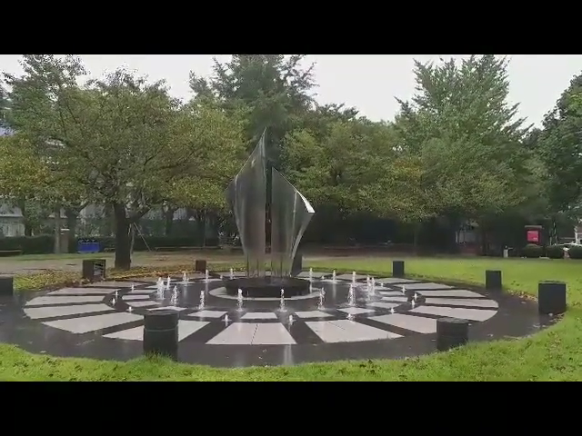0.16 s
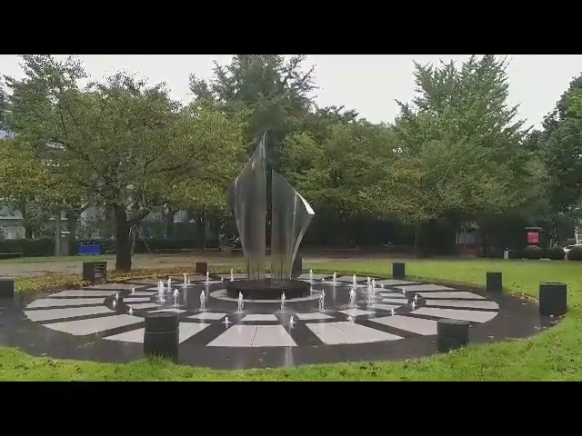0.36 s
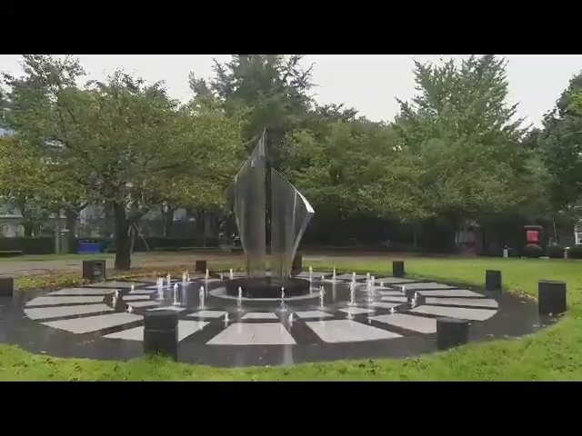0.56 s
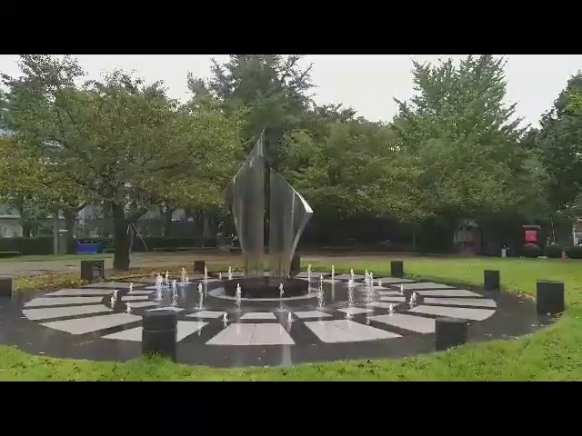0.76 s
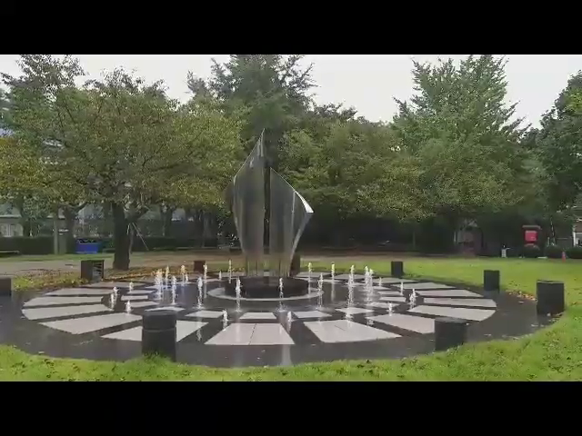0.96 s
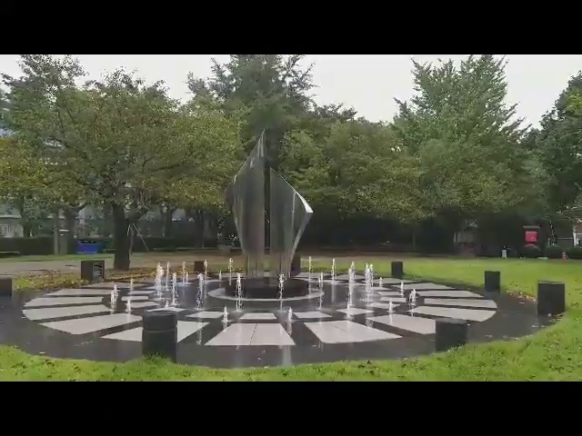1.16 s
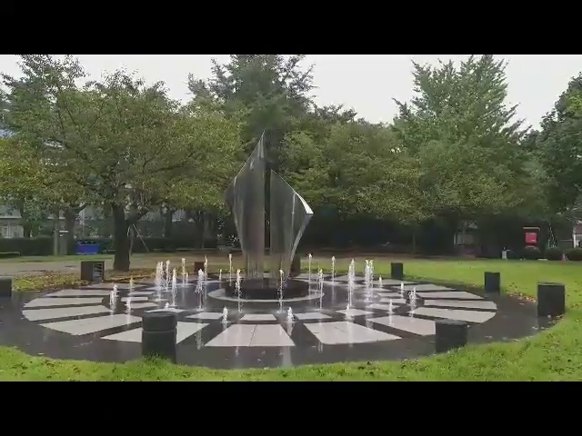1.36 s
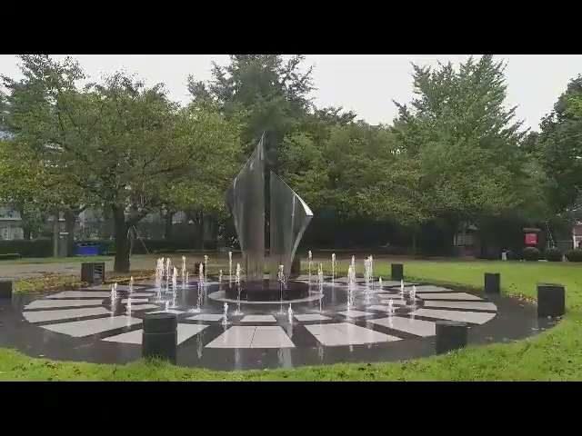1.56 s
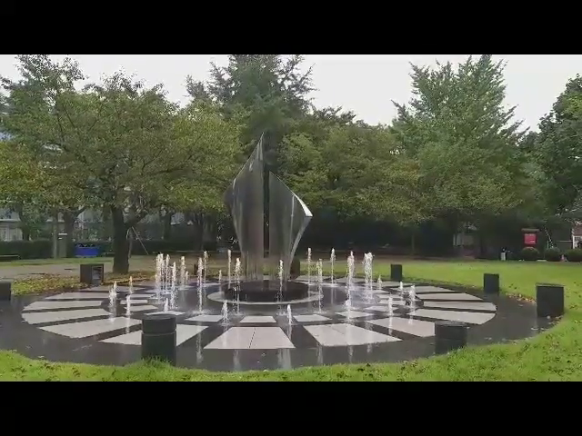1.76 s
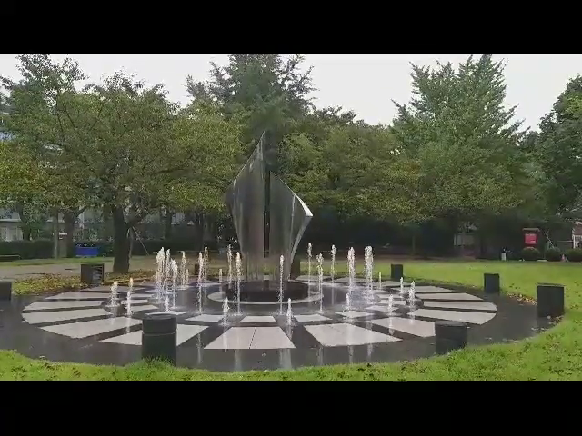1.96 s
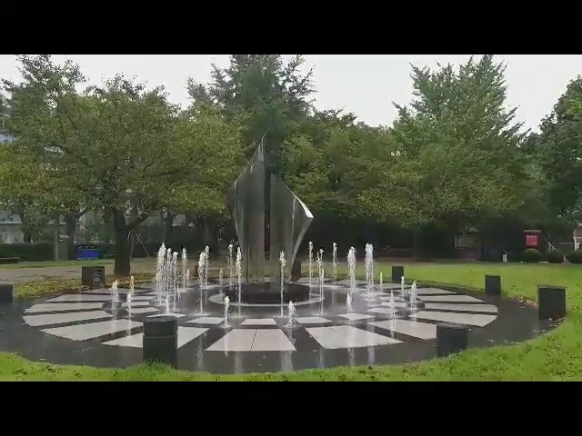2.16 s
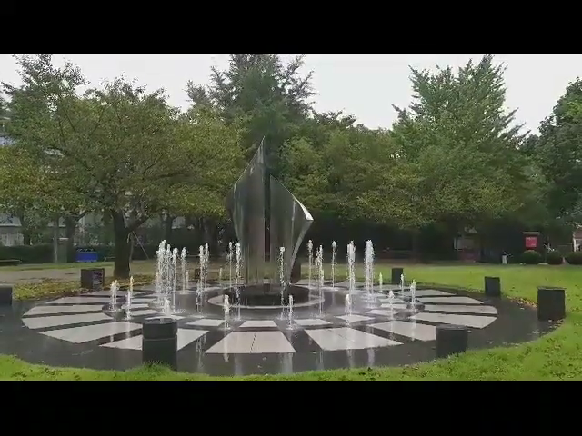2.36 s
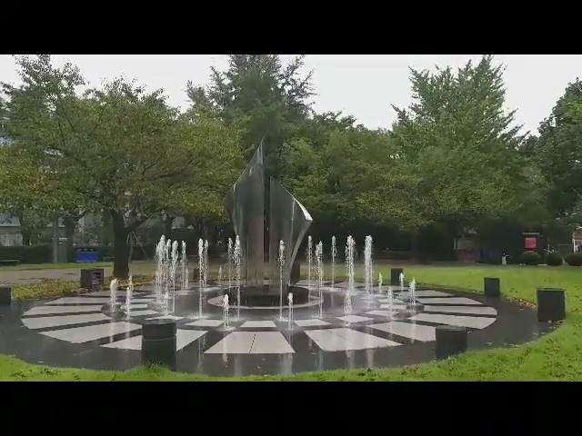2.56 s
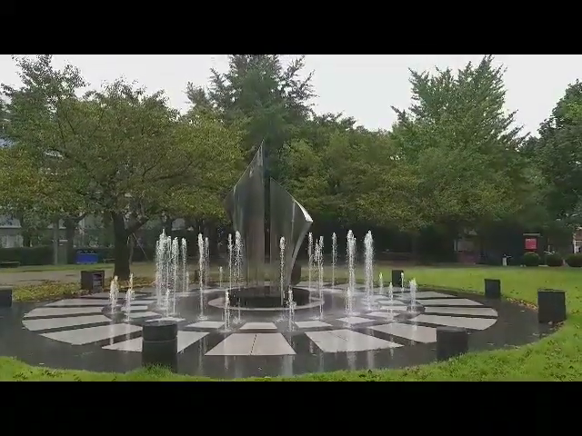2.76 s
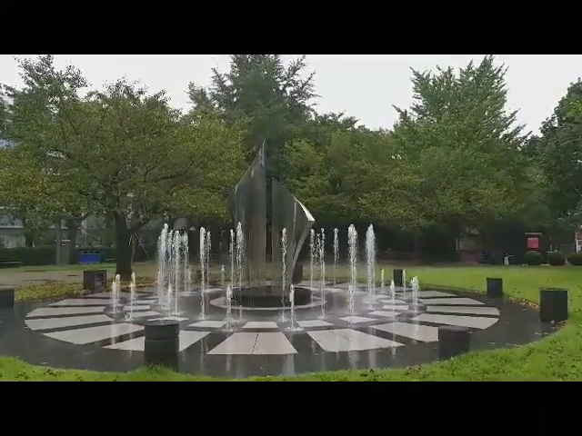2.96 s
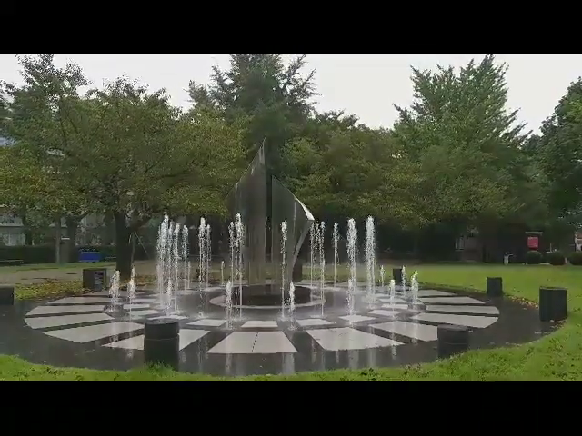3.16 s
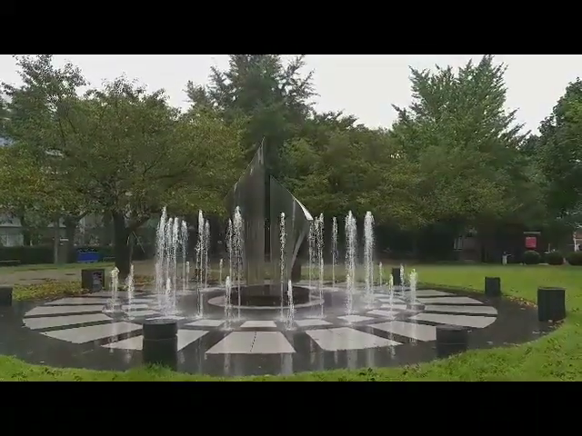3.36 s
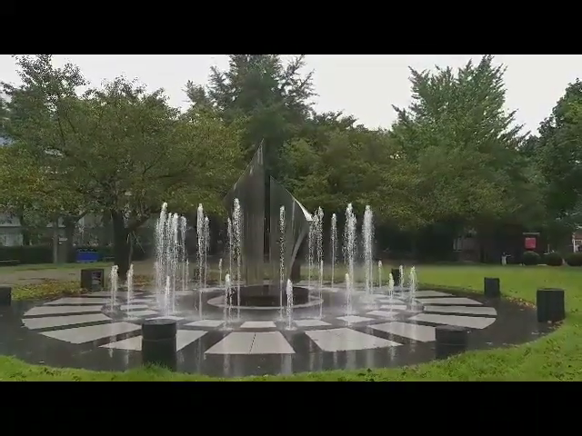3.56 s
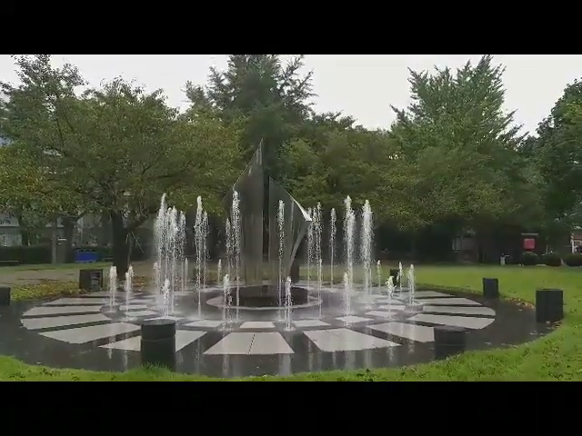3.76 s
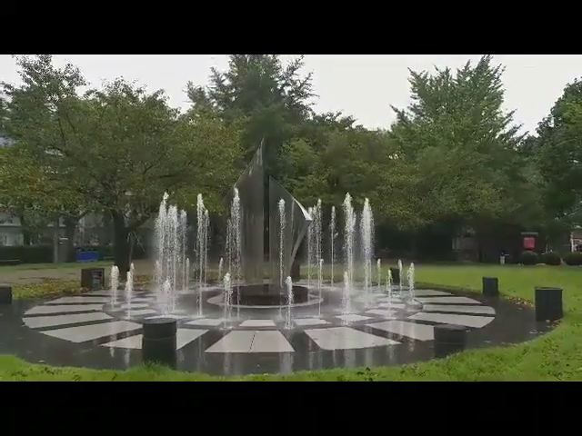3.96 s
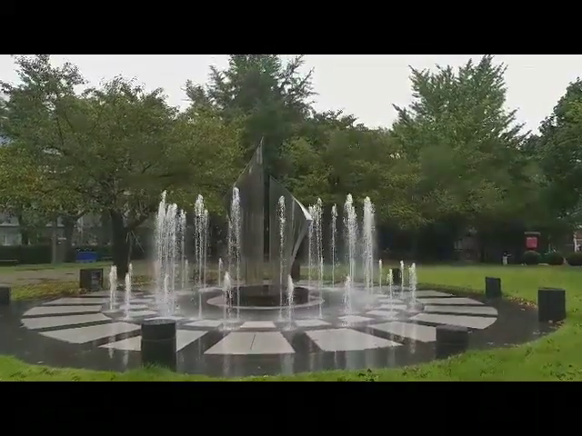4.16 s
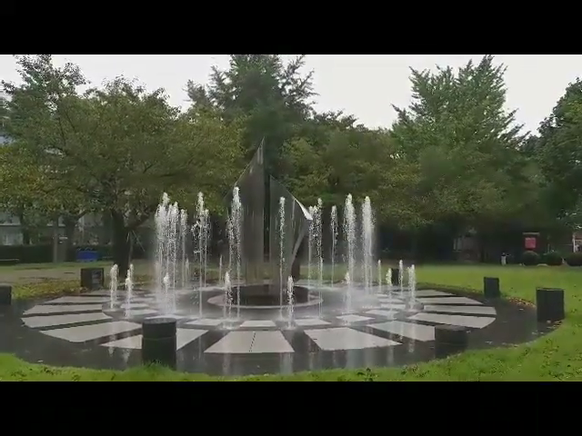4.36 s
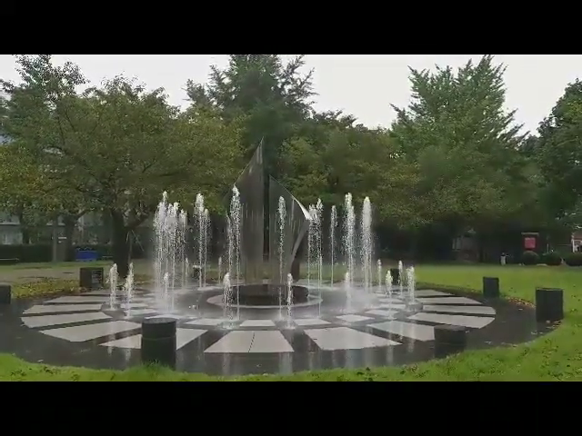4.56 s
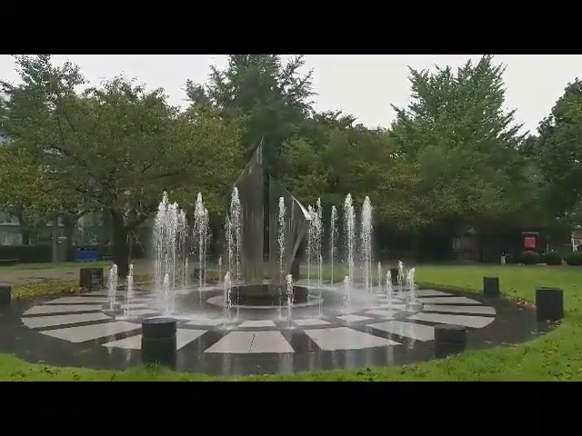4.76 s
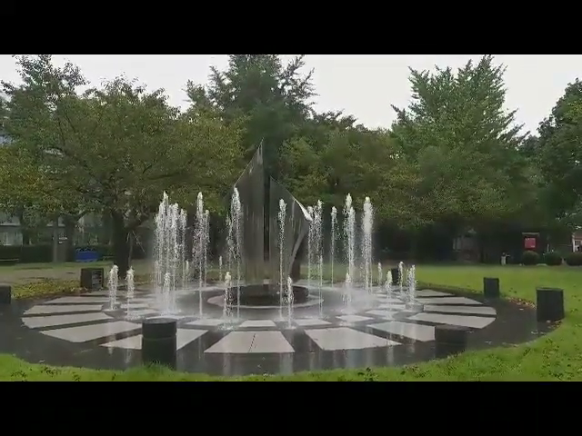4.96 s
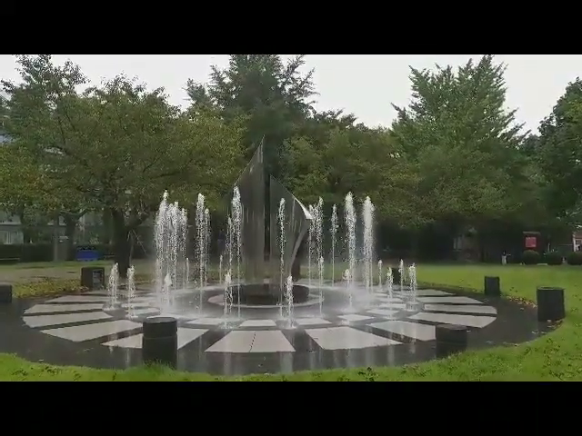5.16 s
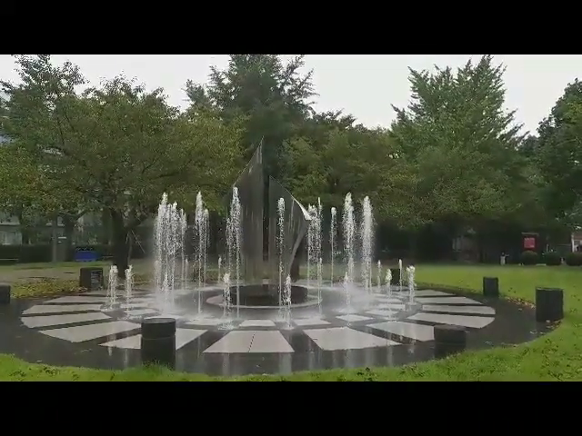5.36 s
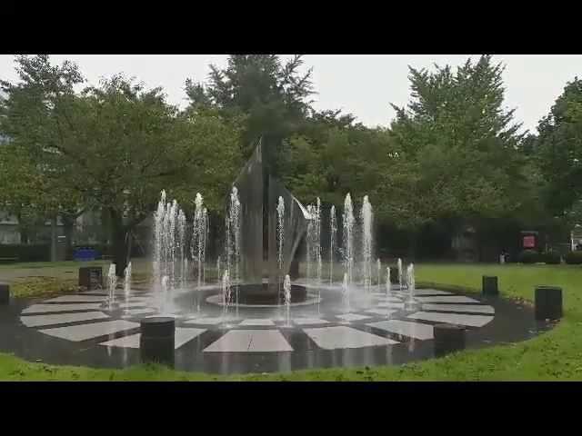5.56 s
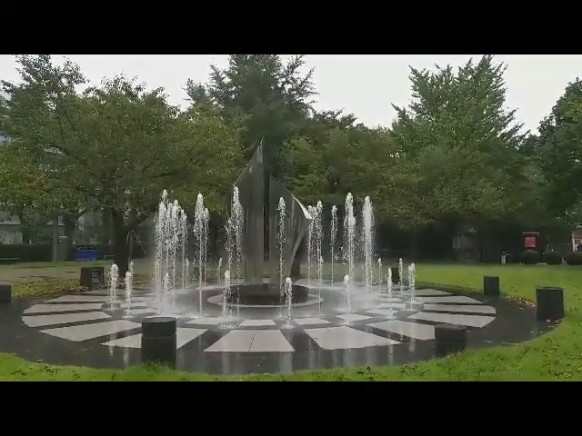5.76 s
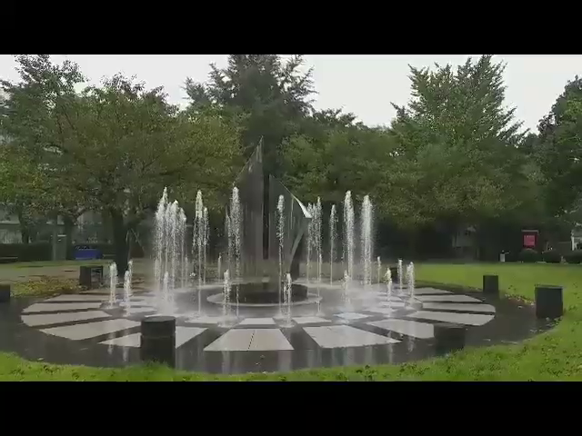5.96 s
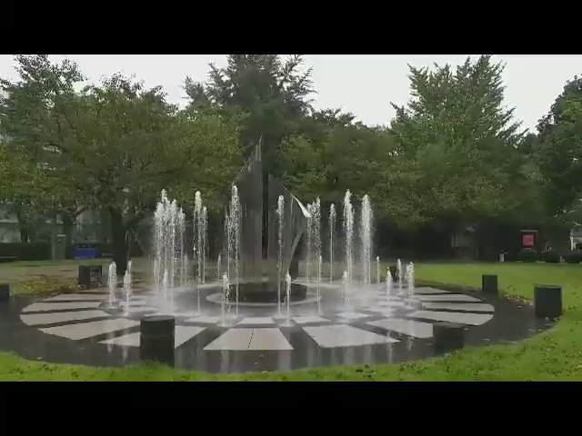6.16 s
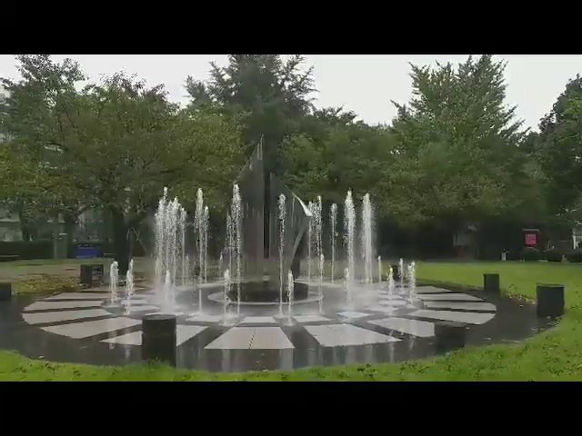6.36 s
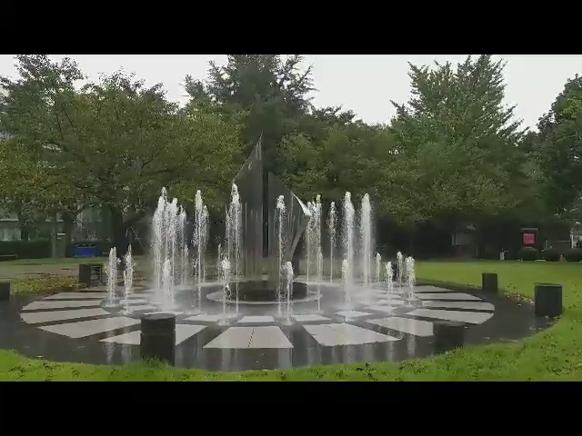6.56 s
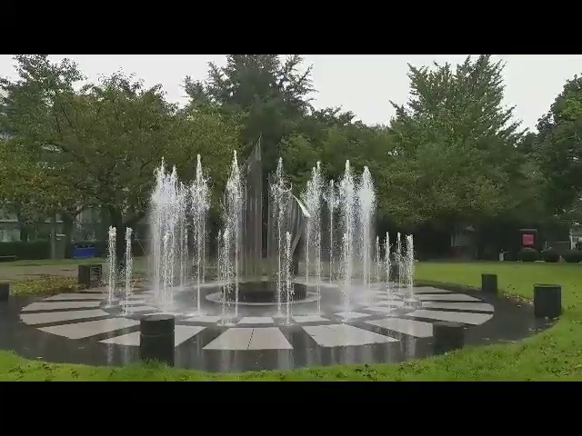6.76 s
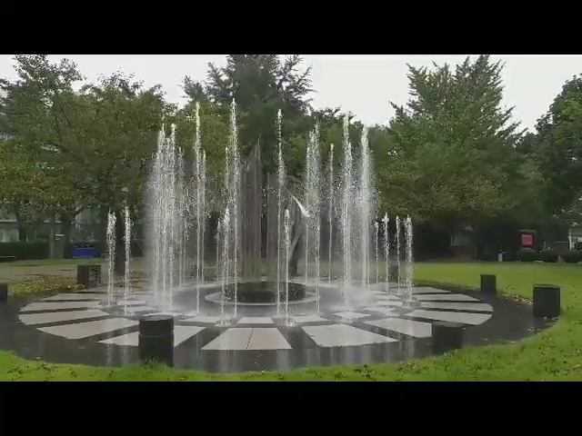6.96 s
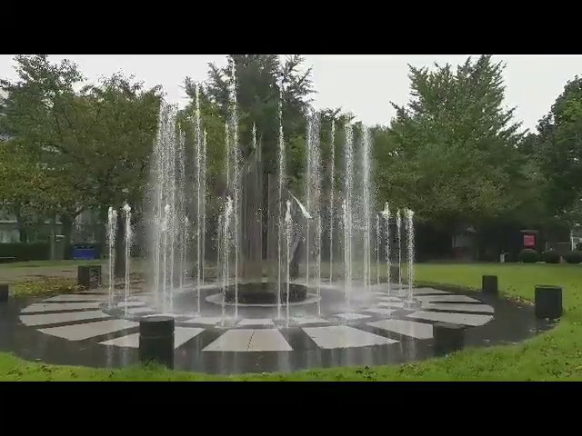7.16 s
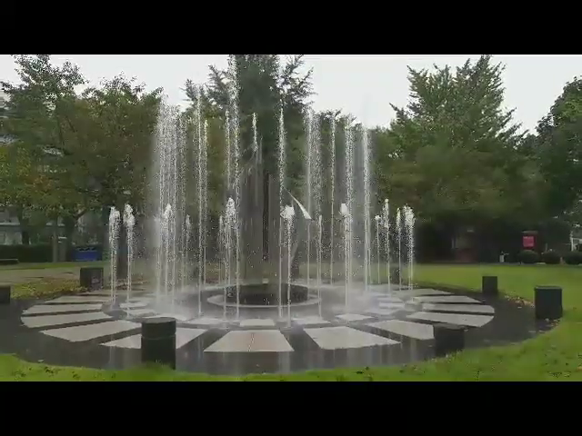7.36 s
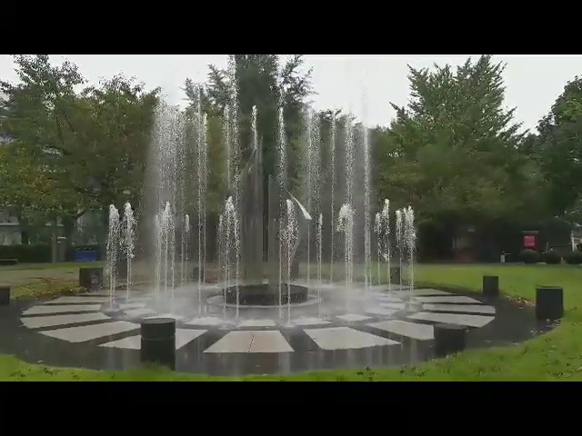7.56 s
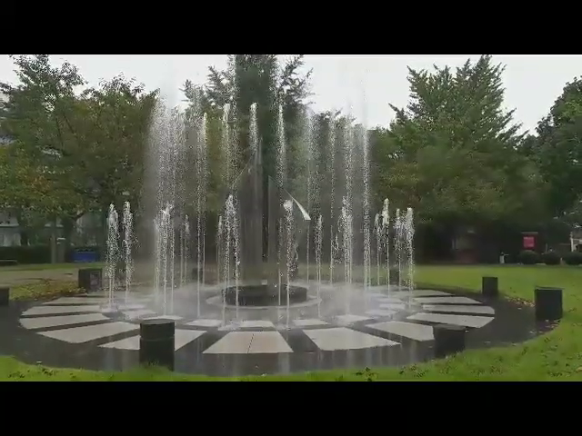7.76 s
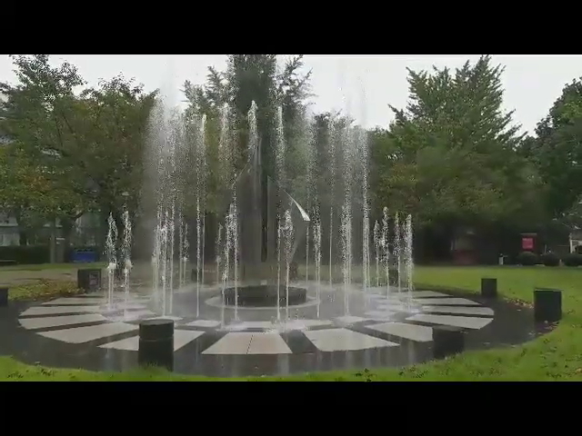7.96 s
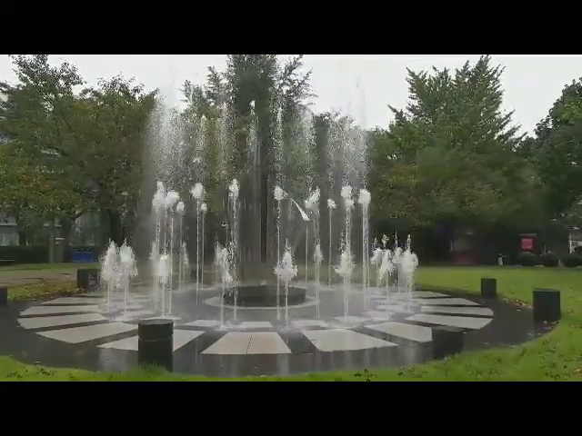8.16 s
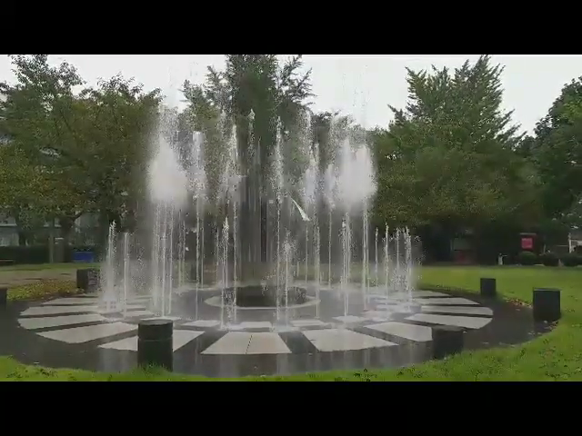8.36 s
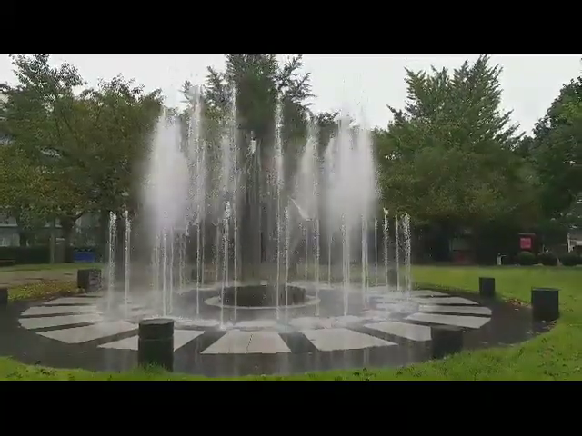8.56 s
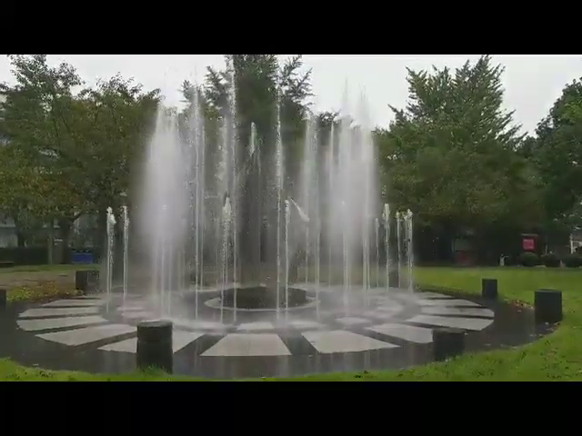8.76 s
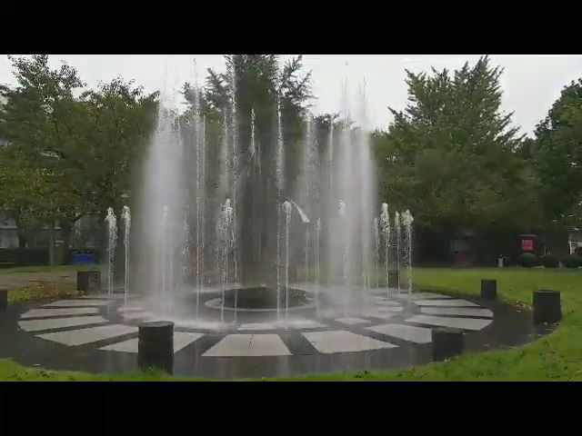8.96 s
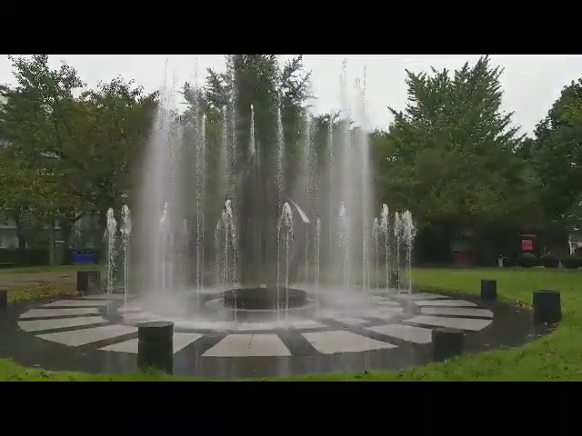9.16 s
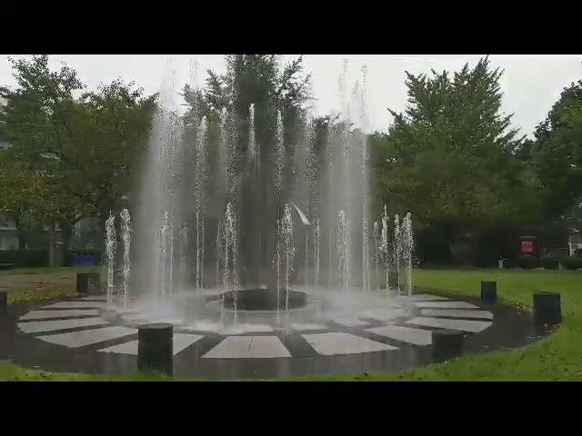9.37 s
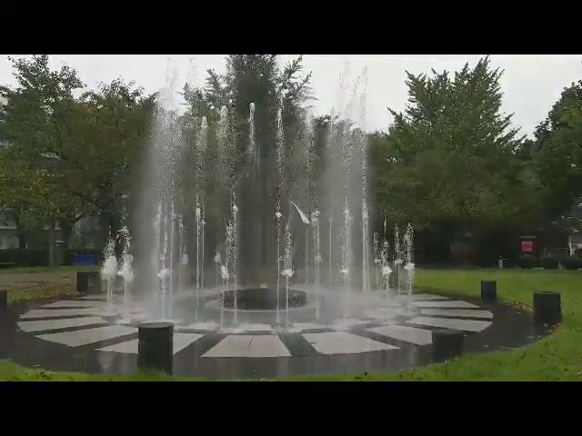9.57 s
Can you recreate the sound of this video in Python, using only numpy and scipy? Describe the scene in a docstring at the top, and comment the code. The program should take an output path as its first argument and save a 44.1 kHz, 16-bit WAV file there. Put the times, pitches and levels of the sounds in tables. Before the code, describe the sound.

Light water ticks over a faint distant town murmur grow into steady, crisp fountain splashing on paving, ending in heavier slapping bursts.

```python
"""Fountain jets on stone paving

A ring of jets rises in a park and its water falls back on wet stone: sign-random ticks, coloured by drop size.
Fine spray patters first; as the jets climb, fat lumps slap down in noise bursts, and near the end a tall
surge lands at once. Small bubbles, decaying sines, burst in the film; heavy columns drum in low-toned ticks.
A town murmurs far behind in filtered noise. The sound is almost mono."""
import sys
import numpy as np
from scipy import signal
from scipy.fft import rfft, irfft, next_fast_len
from scipy.io import wavfile
from scipy.ndimage import map_coordinates

SR = 44100
rng = np.random.default_rng(int(sys.argv[2]) if len(sys.argv) > 2 else 0)


def to_wav(s):
    """Save 16-bit WAV."""
    ch = np.atleast_2d(s).T  # columns
    pcm = np.round(np.clip(ch, -1, 1) * 32767)  # PCM
    wavfile.write(sys.argv[1], SR, pcm.astype(np.int16))


N = 424683

# relative spectra of drops, fat lumps and mist: (frequency [Hz], level [dB per Hz])
DROP_SPECTRUM = [(40, -68), (300, -42.5), (1000, -23.5), (2000, -8), (3000, -0.5), (4000, 0), (5500, -0.5),
                 (7000, -10.5), (9000, -15.5), (15000, -16)]
LUMP_SPECTRUM = [(30, -62), (200, -38), (500, -21.5), (800, -13), (1200, -4.5), (1800, 2), (2600, 6),
                 (4000, -11), (7000, -19.5), (15000, -21)]
MIST_SPECTRUM = [(100, -76), (1000, -38), (3000, -17), (5000, -0.5), (7000, 4), (8200, 5.5), (10000, 2),
                 (13000, -1), (15500, -10.5)]


def amp(db):
    """Decibels to gain."""
    return 10 ** (np.asarray(db) / 20)


def unit(x):
    """Scaled to rms 1."""
    return x / np.sqrt(np.mean(x ** 2) + 1e-20)


def wobble(rate_hz):
    """Smooth random curve, rate_hz knots a second."""
    knots = rng.standard_normal(int(N * rate_hz / SR) + 4)
    return map_coordinates(knots, [np.arange(N) * rate_hz / SR])


def shaped(x, db_at):
    """x through the causal minimum-phase filter of level db_at(Hz), built by folding the cepstrum."""
    size = next_fast_len(len(x) // 2 + 2048) * 2
    hz = np.fft.rfftfreq(size, 1 / SR) + 1  # +1 avoids log(0)
    cepstrum = irfft(np.log(amp(db_at(hz))))
    cepstrum[1:size // 2] *= 2
    cepstrum[size // 2 + 1:] = 0
    response = np.exp(rfft(cepstrum))
    return irfft(rfft(x, size) * response)[:len(x)]


def coloured(x, points):
    """x filtered through (Hz, dB) points, log-interpolated in frequency, at rms 1."""
    point_hz, point_db = np.transpose(points)
    return unit(shaped(x, lambda hz: np.interp(np.log(hz), np.log(point_hz), point_db)))


def impacts(rate_hz, spread_db):
    """Impulses at random moments, log-normal in size with the largest capped."""
    sizes = amp(spread_db * np.minimum(rng.standard_normal(N), 2.4))
    return (rng.random(N) < rate_hz / SR) * sizes


def clusters(rate_hz, spread_db, life_s):
    """Strength, at rms 1, of droplet bursts from shattering lumps; each decays by 1/e in life_s."""
    energy = impacts(rate_hz, spread_db) ** 2
    power = signal.lfilter([1], [1, -np.exp(-2 / (life_s * SR))], energy)
    return unit(np.sqrt(power))


def patter(rate_hz, spread_db):
    """Droplet ticks of either sign, at rms 1."""
    return unit(impacts(rate_hz, spread_db) * rng.choice([-1, 1], N))


def flicker(x, depth_db, band_hz, life_s):
    """Drops of one size land together: bands about band_hz wide swell and fade over about life_s."""
    z = signal.stft(x, nperseg=128)[2]
    across = np.fft.fftfreq(z.shape[0], SR / 128)
    through_hz = np.fft.rfftfreq(8192, 64 / SR)
    smooth = np.exp(-(across[:, None] * band_hz) ** 2) / np.sqrt(1 + (2 * np.pi * through_hz * life_s) ** 2)
    noise = rng.standard_normal(smooth.shape) + 1j * rng.standard_normal(smooth.shape)
    field = np.fft.irfft2(smooth * noise)
    gain = amp(depth_db * unit(field[:, :z.shape[1]]))
    return unit(signal.istft(z * gain, nperseg=128)[1][:N])


def swell(peak_s, length_s):
    """Bell in time, 1 at peak_s, length_s wide at half height."""
    return 0.5 ** ((2 * (np.arange(N) / SR - peak_s) / length_s) ** 2)


def landing():
    """Levels [dB] of lumps, drops, mist and columns: follow the jets, swell in surges, dip in lulls."""
    # water coming down as the jets climb: (time [s], flow below full [dB])
    flow_points = [(0, -17), (0.75, -16), (1.45, -12), (2.0, -8), (3.4, -2.5), (4.8, -0.34), (6.3, -0.07),
                   (8.4, -0.5), (9.63, -0.62)]
    # masses landing together: (peak [s], length [s], lump gain [dB], drop and mist gain [dB], column gain [dB])
    surges = [(1.679, 0.16, 0.5, 2.5, 0), (1.928, 0.16, 0.5, 1, 1), (2.914, 0.4, 2, 0.19, 2),
              (4.038, 0.16, 0, 0.5, 0), (4.42, 0.56, 1, 0, 3), (6.202, 0.3, -0.3, 0.22, 1),
              (7.628, 0.2, 3, 2, 1), (8.051, 0.28, 4, 0.5, 0), (8.599, 0.16, 5.5, 0.92, 3),
              (9.261, 0.34, 5.5, 1.66, 8)]
    # water thrown higher is still in the air: (deepest [s], length [s], spray loss [dB])
    lulls = [(7.369, 0.18, 1.0), (8.805, 0.2, 1.5)]
    lump_lag_s, lump_lull_ratio = 0.11, 2
    tall_from_s, tall_rise_s = 7.3, 1.2  # jets shoot higher and tear up
    column_from_s, column_full_s, column_rise_db = 2.7, 4.2, 7
    sway_rate_hz, spray_sway_db, lump_sway_db = 8, 0.44, 1.24

    t = np.arange(N) / SR
    flow_at = lambda s: np.interp(s, *np.transpose(flow_points))
    tall = np.clip((t - tall_from_s) / tall_rise_s, 0, 1)
    lump_surge, spray_surge, column_surge = sum(
        np.outer(gains_db, swell(peak_s, length_s)) for peak_s, length_s, *gains_db in surges)
    lull = sum(loss_db * swell(deepest_s, length_s) for deepest_s, length_s, loss_db in lulls)
    spray = spray_surge - lull + spray_sway_db * wobble(sway_rate_hz)
    lumps = lump_surge - lump_lull_ratio * lull + lump_sway_db * wobble(sway_rate_hz)
    column_rise = np.interp(t, [column_from_s, column_full_s], [-column_rise_db, 0])

    lump_db = -36 + flow_at(t - lump_lag_s) + 0.7 * tall + lumps
    drop_db = -28.5 + flow_at(t) - 0.71 * tall + spray
    mist_db = -30.74 + 0.92 * flow_at(t) + 1.34 * tall + spray
    column_db = -49 + column_rise + column_surge
    return lump_db, drop_db, mist_db, column_db


def falling_water(lump_db, drop_db, mist_db):
    """Lumps slap the stone and shatter; drops patter between them, the finest mist hisses."""
    flow = amp(drop_db - drop_db.max())
    bursts = clusters(rate_hz=480, spread_db=1.5, life_s=0.0024)

    def shower(burst_share, spread_db):
        """Ticks landing by themselves, denser with flow, plus ticks landing with the bursts."""
        alone = patter(3500 + 12000 * flow, spread_db)
        return alone + burst_share * bursts * patter(20000, spread_db=3)

    slaps = bursts * patter(rate_hz=9000, spread_db=1.0) + 0.8 * patter(rate_hz=300, spread_db=3.5)
    lumps = coloured(slaps, LUMP_SPECTRUM)
    lumps = flicker(lumps, depth_db=1.0, band_hz=1800, life_s=0.018) * amp(lump_db)
    drops = coloured(shower(burst_share=0.83, spread_db=3.5), DROP_SPECTRUM)
    drops = flicker(drops, depth_db=1.0, band_hz=4200, life_s=0.007) * amp(drop_db)
    mist = coloured(shower(burst_share=0.73, spread_db=2.0), MIST_SPECTRUM)
    mist = flicker(mist, depth_db=1.03, band_hz=4500, life_s=0.0098) * amp(mist_db)
    # thin film: small bubbles that burst almost at once; the fizz sinks under the drops as flow grows
    fizz = bubbles(flow, pitch_hz=4817, decay_cycles=7.4, rise=0.013, count=4000)
    fizz = fizz * amp(drop_db - 4.0 - 10.7 * flow)
    plops = bubbles(flow, pitch_hz=2213, decay_cycles=5.1, rise=0.054, count=3000)
    plops = plops * amp(lump_db - 6.5)
    return lumps + drops + mist + fizz + plops


def bubbles(flow, pitch_hz, decay_cycles, rise, count):
    """Tiny bubbles in the film ring as decaying sines, rising in pitch; more with more flow."""
    chance = np.cumsum(np.sqrt(flow))
    start = np.searchsorted(chance, rng.random(count) * chance[-1])
    hz = np.clip(pitch_hz * np.exp(0.267 * rng.standard_normal((count, 1))), 900, 12000)
    size = amp(6.4 * np.minimum(rng.standard_normal((count, 1)), 2))
    step = np.arange(SR // 120)
    turns = hz * step / SR
    phase = 2 * np.pi * turns * (1 + rise * turns / decay_cycles / 2)
    rings = size * np.exp(-turns / decay_cycles) * np.sin(phase)
    sound = np.bincount((start[:, None] + step).ravel(), rings.ravel(), N)[:N]
    return coloured(sound, [(60, -21), (1200, -3)])  # so small a source radiates little bass


def columns(column_db):
    """Unbroken columns of water drum dully on the paving: random ticks, low-toned."""
    # relative spectrum: (frequency [Hz], level [dB per Hz])
    column_spectrum = [(25, -36), (60, -19), (140, 1), (220, -0.5), (400, -2), (700, 3), (1200, 2),
                       (3000, -20)]
    return coloured(patter(rate_hz=1500, spread_db=3.5), column_spectrum) * amp(column_db)


def town():
    """Far traffic, a low murmur of filtered noise, nearly steady."""
    # relative spectrum: (frequency [Hz], level [dB per Hz])
    town_spectrum = [(20, -21), (40, -19), (65, -6), (100, -4), (135, 0.5), (190, -7.5), (380, -15),
                     (600, -4), (1000, -10), (2000, -9), (5000, -7), (15000, -34)]
    return coloured(rng.standard_normal(N), town_spectrum) * amp(-47.5 + 0.25 * wobble(1.4))


def loud_slaps():
    """Big lumps tick on contact; each splash builds within 1 ms and dies, brighter the finer it shatters."""
    # loudest slaps: (time [s], level before the trims below [dB], fineness [-1 fat lump, 0 drops, 1 mist])
    slap_table = [(1.005, -29.5, 0.012), (1.0879, -31, 0), (1.1434, -27, 1), (1.5486, -28, -0.39),
                  (2.5181, -27, -0.9), (2.851, -18, -0.68), (3.0097, -22.5, -1.1), (3.1992, -20.5, -0.35),
                  (3.3915, -20, 0.094), (3.441, -16.5, 0.039), (3.5076, -17.5, 0), (3.67, -19, -0.33),
                  (3.9458, -18, -0.29), (4.041, -21, -1.1), (4.277, -22, -0.45), (4.823, -17.5, 0.53),
                  (5.0655, -16, 0.57), (5.1018, -18.5, -0.33), (5.24, -22, -0.9), (5.431, -23, -0.4),
                  (5.6042, -17, 0.4), (6.0864, -15.5, -0.33), (6.2303, -18, -0.44), (6.272, -19.5, -0.9),
                  (6.378, -17.5, -0.32), (6.476, -20.5, 0.45), (6.946, -24, 0.038), (7.157, -18, 0),
                  (7.411, -17, 0.26), (7.424, -20.5, -0.0051), (7.889, -21.5, -0.72), (8.148, -22, -0.9),
                  (8.203, -19, 0.46), (8.34, -17, 0.37), (9.014, -24, -0.94), (9.5334, -18, -0.22)]
    crack = 2.6  # contact tick relative to the splash noise
    breadth = 0.17  # spread over neighbouring sizes [fineness steps]
    # per size: spectrum, splash life [s], trim [dB]
    sizes = [(LUMP_SPECTRUM, 0.0009, -11.5), (DROP_SPECTRUM, 0.0008, -11.5), (MIST_SPECTRUM, 0.0005, -13.0)]
    out = np.zeros(N + SR)
    t = np.arange(SR // 40) / SR

    def burst(life_s):
        envelope = np.sqrt(t / life_s) * np.exp(-t / life_s)
        return crack * (t == 0) + rng.choice([-1, 1], len(t)) * envelope

    for time_s, level_db, fineness in slap_table:
        shares = 1 / (1 + ((np.array([-1, 0, 1]) - fineness) / breadth) ** 2)
        gains = np.sqrt(shares / shares.sum())
        slap = sum(gain * amp(level_db + trim_db) * coloured(burst(life_s), spectrum)
                   for gain, (spectrum, life_s, trim_db) in zip(gains, sizes))
        out[round(time_s * SR):][:len(t)] += slap
    return out[:N]


def scene():
    """Everything stands straight ahead, alike in both channels."""
    lump_db, drop_db, mist_db, column_db = landing()
    sound = falling_water(lump_db, drop_db, mist_db) + loud_slaps() + columns(column_db) + town()
    return np.array([sound, sound])


def record(dry):
    """The housing colours the sound, left and right differ slightly in two narrow bands, the top is cut off."""
    # microphone housing resonances and notches: (centre [Hz], width [octaves], level [dB])
    housing = [(440, 0.22, -6.5), (600, 0.29, 4), (935, 0.087, -2), (1237, 0.2, 4.5), (1906, 0.12, 6),
               (2192, 0.034, -4), (2782, 0.066, -5.5), (3160, 0.02, 1), (3770, 0.056, 2.5), (4350, 0.15, 4),
               (6720, 0.11, -1.5), (9940, 0.25, 5), (10420, 0.09, -5)]
    # left and right differ slightly in level in two narrow bands:
    # (centre [Hz], width [octaves], left minus right [dB])
    channel_lean = [(1917, 0.15, 4.5), (9540, 0.037, -6)]
    top_hz = 15550

    def bells(table, hz):
        return sum(db * np.exp(-.5 * (np.log2(hz / centre_hz) / width_oct) ** 2)
                   for centre_hz, width_oct, db in table)

    pair = [shaped(x, lambda hz: bells(housing, hz)) for x in dry]
    size = next_fast_len(N + SR // 10)
    hz = np.fft.rfftfreq(size, 1 / SR)
    lean_db = bells(channel_lean, hz + 1) / 2
    spectrum = rfft(pair, size) * amp([lean_db, -lean_db]) * (hz < top_hz)
    return irfft(spectrum, size)[:, :N]


dry = scene()
out = record(dry)
to_wav(out)
```